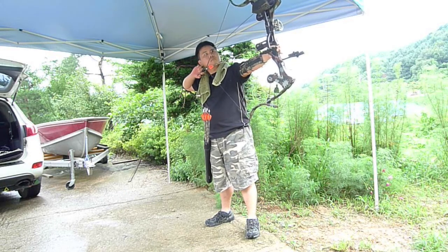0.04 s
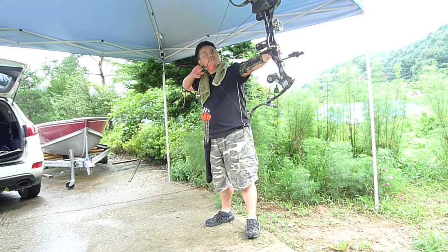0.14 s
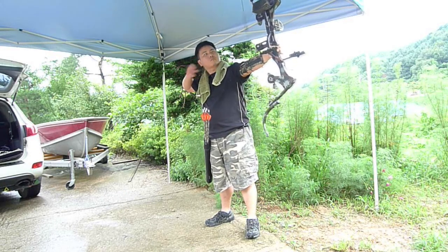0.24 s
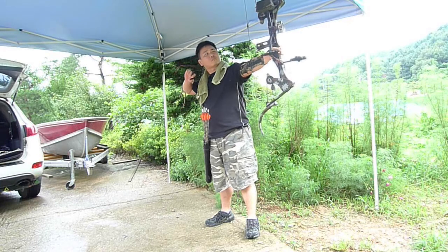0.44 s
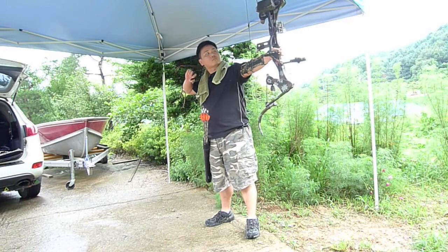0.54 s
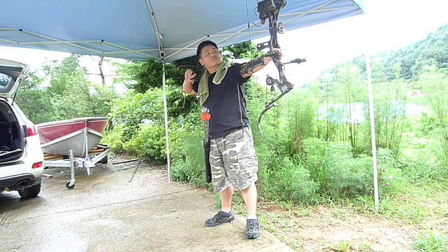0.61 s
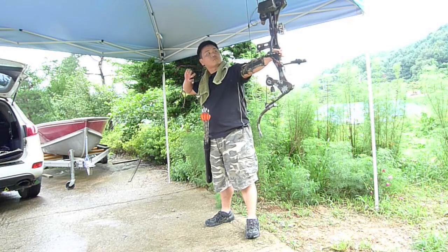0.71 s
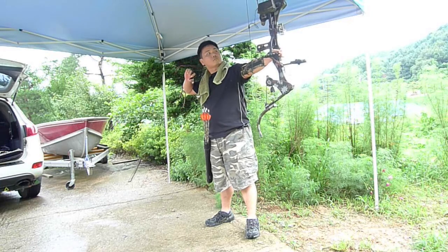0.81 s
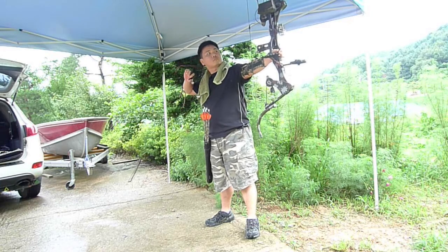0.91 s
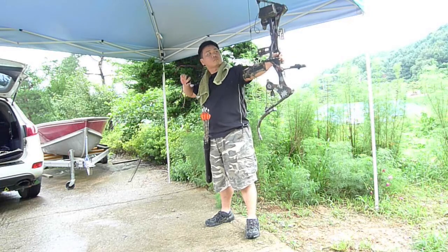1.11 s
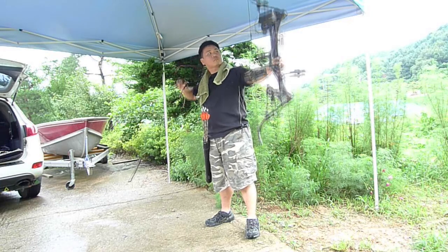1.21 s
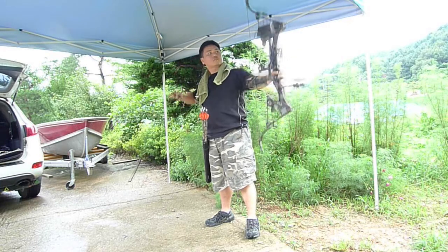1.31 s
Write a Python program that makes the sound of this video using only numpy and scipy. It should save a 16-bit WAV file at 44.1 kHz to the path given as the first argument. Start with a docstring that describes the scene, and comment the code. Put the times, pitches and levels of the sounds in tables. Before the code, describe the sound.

A compound bow fires one shot close by, over a faint, steady outdoor rush. At about 0.25 seconds a small click leads into the sharp slap of the string, with a short low twang and rattling fittings that fade by about 0.6 seconds. Near 0.65 seconds the arrow hits a target with a crack and dead thud. A soft echo dies away, leaving the quiet background.

```python
"""A click and a sharp slap: a compound bow is released under a canopy and its string snaps home.
The bow's limbs and loose fittings rattle while the string twangs. About 0.4 s later the arrow
thuds into a target, and the surroundings throw back an echo. A faint outdoor rush lies beneath.
The shot is dull above 4 kHz, apart from a faint mirrored copy of it in the top octave."""
import sys
import numpy as np
from scipy import signal
from scipy.fft import rfft, irfft
from scipy.io import wavfile
from scipy.ndimage import uniform_filter1d

SR = 44100
rng = np.random.default_rng(int(sys.argv[2]) if len(sys.argv) > 2 else 0)


def master(y):
    """Save y as 16-bit WAV."""
    cut = np.clip(np.atleast_2d(y).T, -1, 1)
    pcm = np.round(cut * 32767)  # scale
    wavfile.write(sys.argv[1], SR, pcm.astype(np.int16))


N = 59535

# Clicks of the release, string stop and fittings: t/s, level/dB, rise/s, fade/s
# (t is when a sound starts; fade is the time it takes to drop by 60 dB)
CLICKS = [(.239, -36.5, 0.0014, 0.025), (0.2523, -17.5, 0.00115, 0.019), (0.256, -22.5, 0.00046, 0.022),
          (0.4446, -44.5, 0.00091, 0.011), (.4865, -54, .001, 0.025)]
# Tone colour of the clicks: f/Hz, relative level/dB
CLICK_COLOUR = [(100, -7), (1000, -14.5), (2200, -11), (2900, -3), (3450, 4), (3750, -2.5), (4000, -19),
                (4400, -25), (5200, -29), (6300, -67)]
# Knocks through the bow's frame: t/s, clack level/dB, ring level/dB
KNOCKS = [(0.235, -36.5, -45), (.2552, -28.5, -36.5), (0.2651, -28, -37), (0.274, -27, -38.5),
          (.2842, -26, -44)]
# Tone colour of the frame's clacks and buzz: f/Hz, relative level/dB
FRAME_COLOUR = [(40, -34), (90, -28), (135, -14), (300, -5), (480, -7.5), (1100, -1.5), (2000, -5.5),
                (3400, -10.5), (4200, -24.5), (5700, -45.5), (8000, -76)]
# Tones the knocked bow rings with: f/Hz, level/dB (added to the knock's ring level), fade/s
BOW_TONES = [(390, -11, .2), (632, -15, .52), (781, -8, .25), (901, -3, .24), (1043, -4, .28),
             (1160, 0, .22), (1228, -6, .28), (1408, -9, .36), (1500, -6, .22), (1677, -3, .26),
             (2076, -7, .22), (2592, -9, .27), (2777, -9, .3), (2821, -9, .27), (2969, -9, .25),
             (3130, -10, .22), (3393, -8, .18)]
# Low tones of the limbs' kick: f/Hz, level/dB, fade/s
LIMB_TONES = [(34.7, -41, 0.044), (165, -34.5, 0.053), (294, -29.5, 0.069)]
# Tones of the string, before its swell and damping: f/Hz, level/dB, fade/s
STRING_TONES = [(131.6, -51.5, 0.71), (262.2, -32.5, 0.57)]
# Hums of a loose part: t/s, f/Hz, level/dB, fade/s
HUMS = [(.332, 575.5, -39.5, 0.23), (.487, 585, -46.5, 0.11)]
# Tones the struck target rings with: f/Hz, level/dB, fade/s
TARGET_TONES = [(300, -21, 0.038), (569, -20, 0.019), (756, -15.5, 0.0098), (940, -21.5, .024),
                (1200, -37.5, 0.058), (1650, -26.5, 0.02), (2323, -36, 0.021), (3120, -41, 0.016),
                (3380, -33, 0.01)]
# Echoes of the hit from near and far: t/s, level/dB, rise/s, fade/s, centre f/Hz, width/octaves
ECHOES = [(.664, -35.5, 0.0019, 0.053, 800, 1.25), (0.667, -38.5, .004, 0.33, 600, 1.26),
          (.777, -48.5, 0.012, 0.48, 1160, 0.35), (0.782, -53, 0.0094, 0.38, 2240, 0.13),
          (.92, -55, 0.05, 1.6, 1160, .5)]
# Tone colour shared by all echoes: f/Hz, relative level/dB
ECHO_COLOUR = [(60, -28), (150, -10), (300, 3), (2500, -1), (3600, -2.5), (4400, -33), (6000, -62)]
# Tone colour of the outdoor background: f/Hz, relative level/dB
AIR_COLOUR = [(20, 11), (45, -22), (75, -4), (110, -5.5), (175, 0), (260, -3), (450, -4.5), (750, -7.5),
              (1200, -9), (1700, -10), (2860, -15), (3600, -21.5), (4700, -30.5), (7000, -33.5),
              (10000, -41), (13000, -57.5), (14500, -70)]
# How strong the mirrored treble is at each frequency: f/Hz, gain/dB
MIRROR_COLOUR = [(9000, -24), (11000, -14.5), (12600, -23.5), (13500, -30), (14500, -47)]

TIMES = np.arange(N) / SR  # t/s of each sample
FREQS = np.fft.rfftfreq(N, 1 / SR)  # f/Hz of each point in a spectrum


def clicks():
    """Small hard parts snap together, each giving a short, bright burst of noise."""
    colour = colour_curve(CLICK_COLOUR)
    return sum(gain(db) * envelope(start, rise, fade) * noise(colour) for start, db, rise, fade in CLICKS)


def frame_rattle(knock_rise_s=0.00062, waver_hz=5.3):
    """Loose fittings buzz unevenly, while each knock clacks and sets the bow ringing."""
    colour = colour_curve(FRAME_COLOUR)
    chatter = gain(3 * np.tanh(drift(seconds=0.0023)))  # the level flutters by up to 3 dB
    buzz = normalise(chatter * noise(colour))
    sound = gain(-29.5) * envelope(start=0.243, rise=0.027, fade=0.45) * buzz
    for start, clack_db, _ in KNOCKS:
        sound += gain(clack_db) * envelope(start, knock_rise_s, fade=0.049) * noise(colour)
    for hz, db, fade in BOW_TONES:
        energy = sum((gain(ring_db) * envelope(start, knock_rise_s, fade)) ** 2
                     for start, _, ring_db in KNOCKS)
        pitch_hz = hz + waver_hz * drift(seconds=0.015)  # rattling parts shift the tone a little
        cycles = rng.random() + np.cumsum(pitch_hz) / SR
        sound += muffle(gain(db) * np.sqrt(energy) * np.sin(2 * np.pi * cycles))
    return sound


def limb_kick():
    """The limbs, the bow's springy arms, kick forward with a low thump."""
    return muffle(ring(start=0.2545, tones=LIMB_TONES))


def string_twang(start=0.256, rise_s=0.037, damp_s=0.2):
    """The string swings up into its twang until the dampers choke it."""
    age = since(start)
    swell = np.minimum(age / rise_s, 1)
    damping = np.exp(-(age / damp_s) ** 4)
    return ring(start, STRING_TONES) * swell * damping


def loose_part_hums(rise_s=0.003):
    """A loose part hums softly and briefly as the bow rocks."""
    return sum(gain(db) * envelope(start, rise_s, fade) * np.sin(2 * np.pi * hz * since(start))
               for start, hz, db, fade in HUMS)


def arrow_hit(tip_hz=2500, tip_db=-16.5, tip_fade_s=0.0042, bass_cut_hz=220):
    """The arrow's tip cracks the target's face, then the target takes the blow with a dead thud."""
    tick = ring(start=0.6611, tones=[(tip_hz, tip_db, tip_fade_s)])
    thud = -ring(start=0.6626, tones=TARGET_TONES)  # swings the opposite way to the tick
    bass_cut = signal.butter(2, bass_cut_hz, "high", fs=SR, output="sos")
    return signal.sosfilt(bass_cut, muffle(tick + thud))


def echoes():
    """The surroundings scatter the hit back as fading bands of noise."""
    sound = np.zeros(N)
    for start, db, rise, fade, centre_hz, width in ECHOES:
        octaves_away = np.log2((FREQS + 1) / centre_hz)
        band_db = -10 * np.log10(1 + (octaves_away / width) ** 4)
        sound += gain(db) * envelope(start, rise, fade) * noise(colour_curve(ECHO_COLOUR) + band_db)
    return sound


def outdoor_air(level_db=-53, patch_db=1):
    """A faint, steady rush in which patches of pitch grow slightly louder and softer."""
    slicing = dict(nperseg=1024, noverlap=768)
    _, _, slices = signal.stft(noise(colour_curve(AIR_COLOUR)), SR, **slicing)
    patches = uniform_filter1d(rng.standard_normal(slices.shape), size=10, axis=0)  # blur over pitch
    patches = normalise(uniform_filter1d(patches, size=12, axis=1))  # blur over time
    _, rush = signal.istft(slices * gain(patch_db * patches), **slicing)
    return gain(level_db) * normalise(rush[:N])


def gain(db):
    """Turns decibels into a number to multiply by."""
    return 10 ** (np.asarray(db) / 20)


def normalise(sound):
    """Scales a sound to an average strength (rms) of 1."""
    return sound / np.sqrt(np.mean(sound ** 2) + 1e-20)


def colour_curve(points):
    """Joins a table's points into a curve in dB over all frequencies, spaced like musical pitch."""
    hz, db = np.transpose(points)
    return np.interp(np.log(FREQS + 1), np.log(hz + 1), db)


def noise(colour_db):
    """Noise of strength 1 with the given tone colour."""
    white_spectrum = rfft(rng.standard_normal(N))
    return normalise(irfft(white_spectrum * gain(colour_db), N))


def drift(seconds):
    """A random wobble of strength 1 that changes in about the given time."""
    return noise(-10 * np.log10(1 + (2 * FREQS * seconds) ** 4))


def since(start):
    """Seconds since the start, zero before it."""
    return np.maximum(TIMES - start, 0)


def envelope(start, rise, fade):
    """Loudness over time: a straight climb, then a drop of 60 dB every `fade` seconds."""
    climb = np.minimum(since(start) / rise, 1)
    return climb * np.exp(-np.log(1000) * since(start + rise) / fade)


def ring(start, tones):
    """Pure tones that are struck together and die away."""
    age = since(start)
    return sum(gain(db) * np.exp(-np.log(1000) * age / fade) * np.sin(2 * np.pi * hz * age)
               for hz, db, fade in tones)


def muffle(sound, cutoff_hz=3800):
    """Takes the bright edge off a struck sound."""
    return signal.sosfilt(signal.butter(10, cutoff_hz, fs=SR, output="sos"), sound)


def scene():
    """Bow, arrow and background, mixed into one channel."""
    bow = clicks() + frame_rattle() + limb_kick() + string_twang() + loose_part_hums()
    return (bow + arrow_hit() + echoes() + outdoor_air())[None]


def record(dry):
    """Adds a faint, high copy with its frequencies flipped over, then cuts the very top."""
    mirror_hz, top_hz = 16000, 14600
    mirrored = 2 * dry * np.cos(2 * np.pi * mirror_hz * TIMES)  # a tone at f shows up at mirror_hz - f
    faint_copy = irfft(rfft(mirrored) * gain(colour_curve(MIRROR_COLOUR)), N)
    top_cut = signal.firwin(401, top_hz, window=("kaiser", 9), fs=SR)
    return signal.oaconvolve(dry + faint_copy, top_cut[None], "same")


dry = scene()
out = record(dry)
master(out)
```